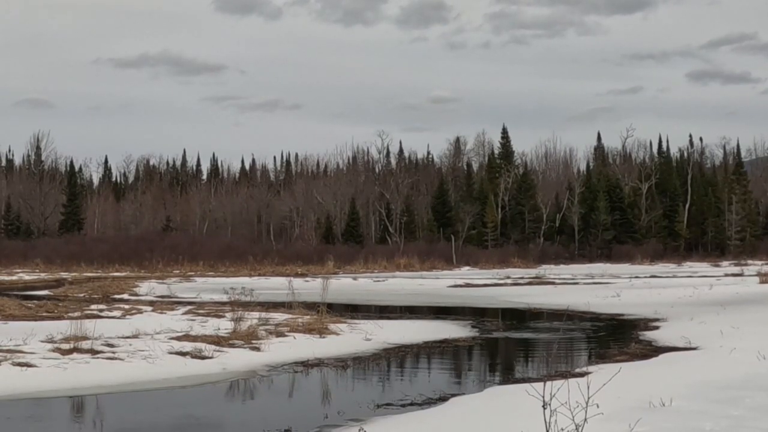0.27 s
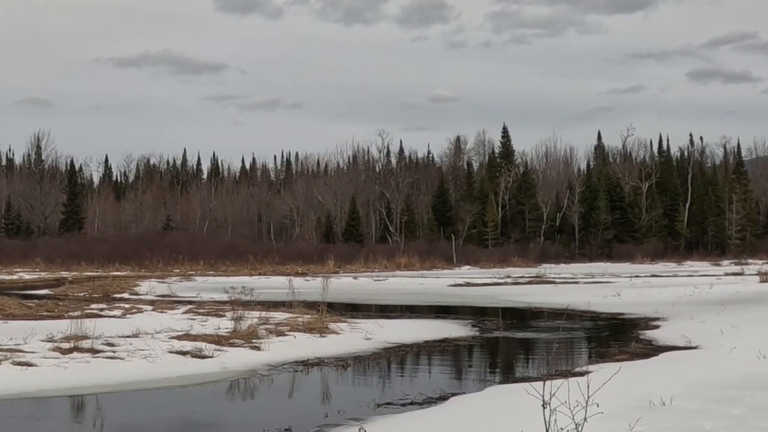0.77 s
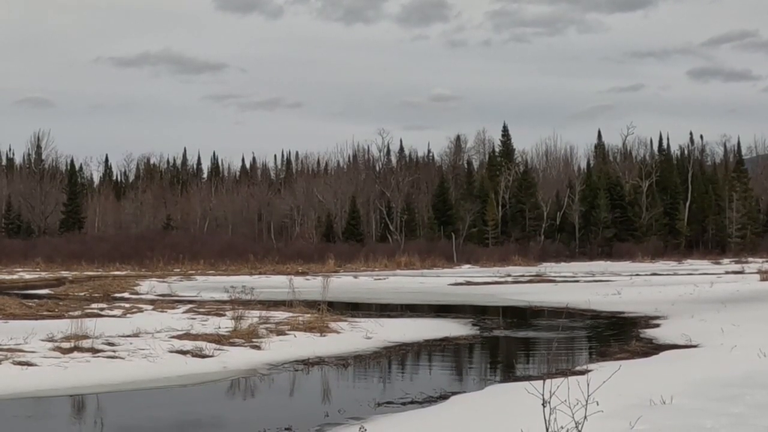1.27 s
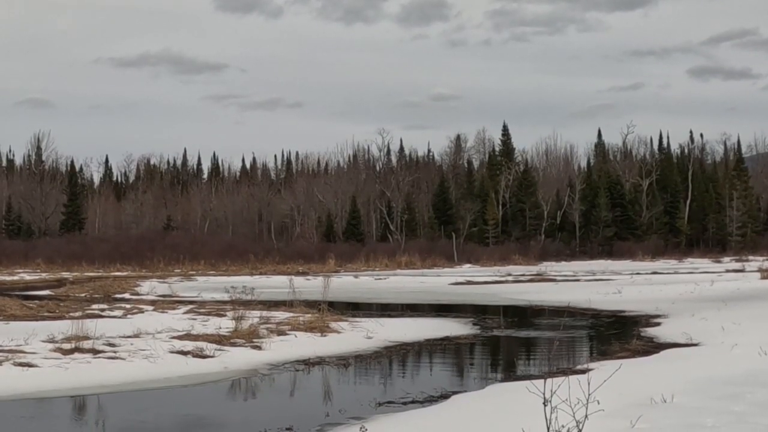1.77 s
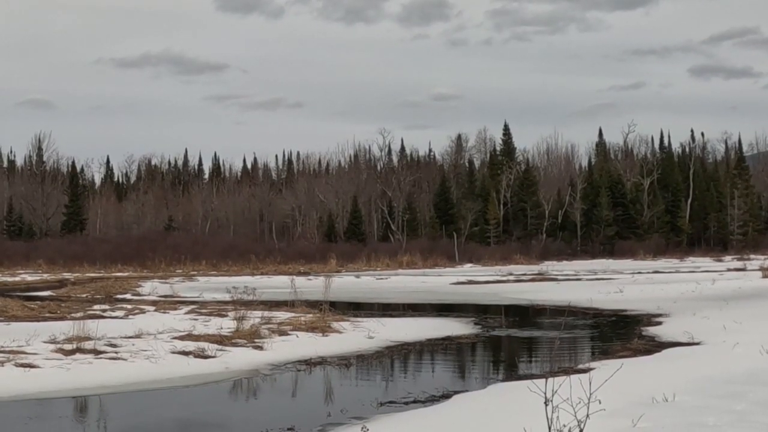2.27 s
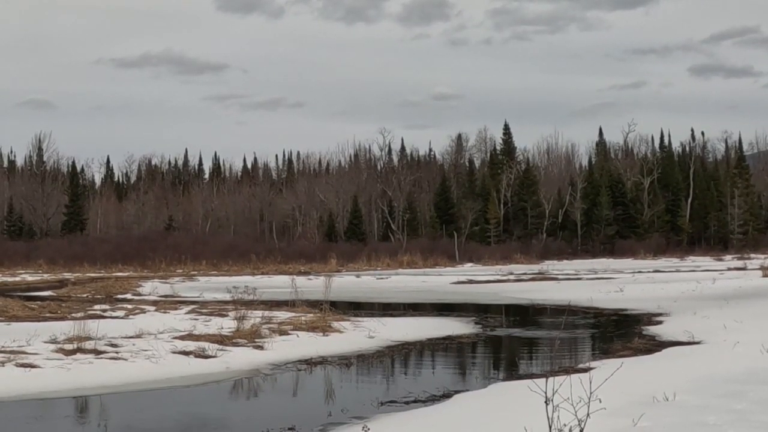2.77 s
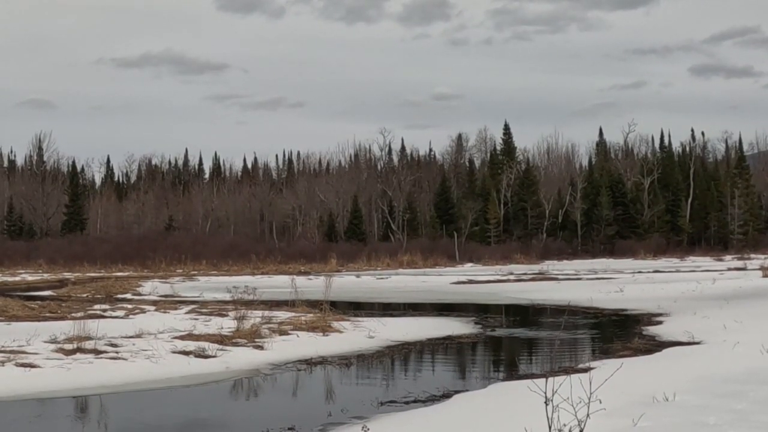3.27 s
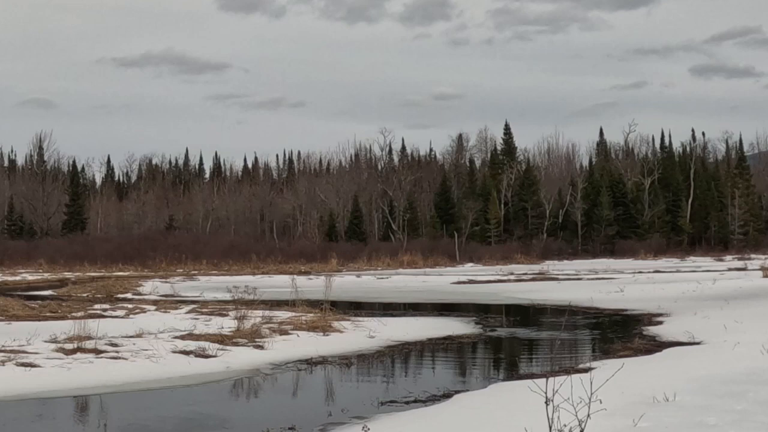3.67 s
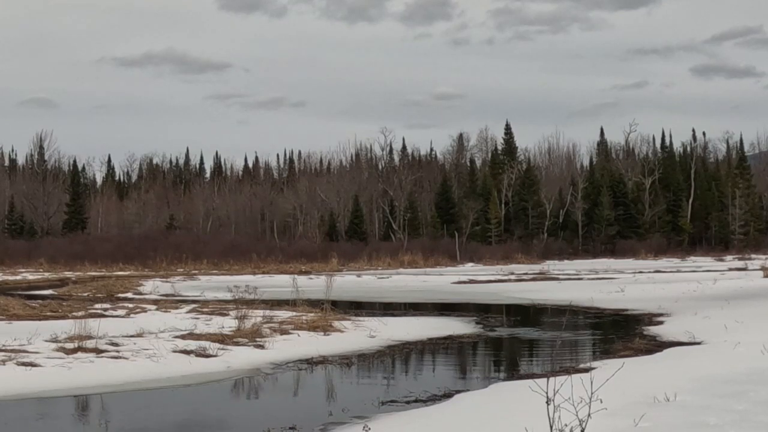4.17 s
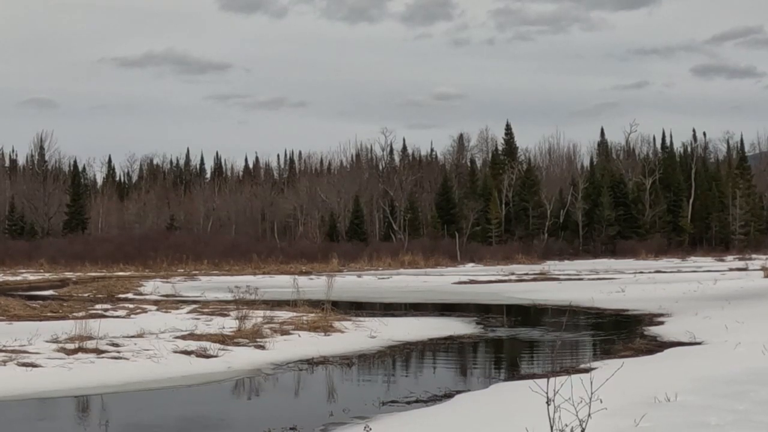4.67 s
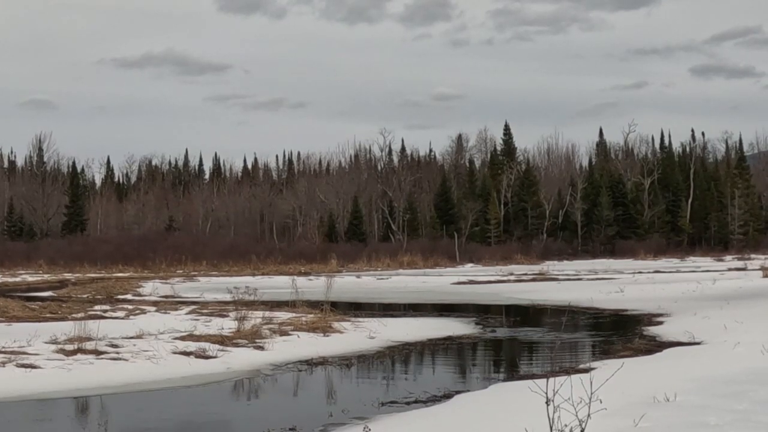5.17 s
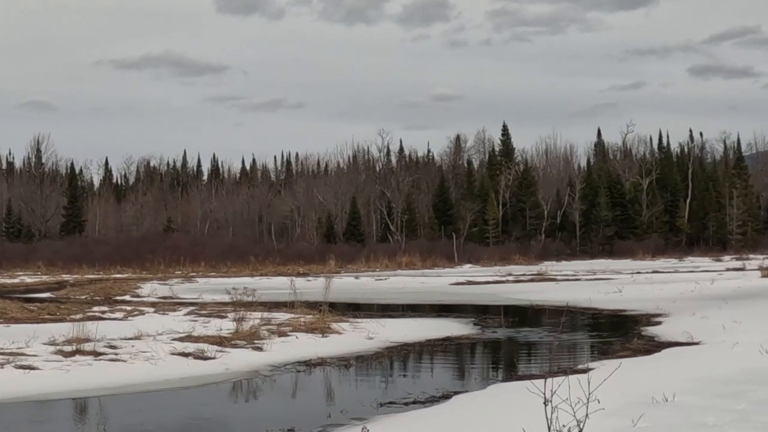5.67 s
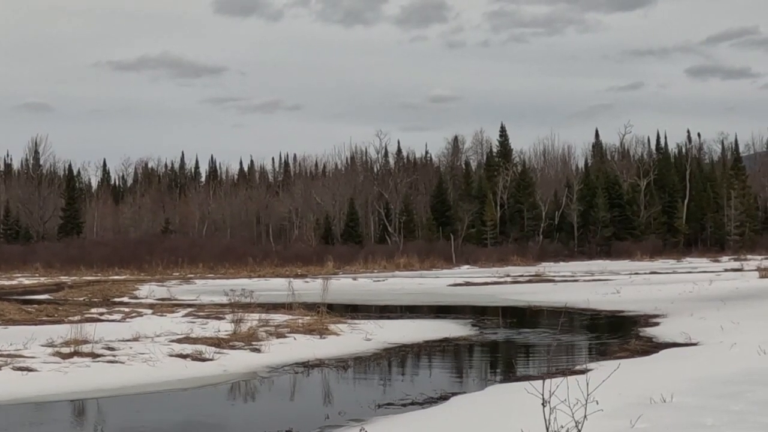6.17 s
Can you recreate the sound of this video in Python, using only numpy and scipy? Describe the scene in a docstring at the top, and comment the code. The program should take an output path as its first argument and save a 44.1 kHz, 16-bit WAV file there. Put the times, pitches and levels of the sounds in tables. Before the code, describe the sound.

Throughout about 6.4 seconds, a soft broad wind hiss comes from a distant forest, over a faint low rush, with dull gusts rumbling on the microphone, notably around 0.9, 1.35 and 2.1 s. A small woody tick sounds at 0.36 s, with two brighter ones at 1.7 and 1.9 s as snow is softly pressed. At 2.42 s an otter gives a very short arched chirp, followed at 2.6 s by a dull, granular crunch of snow crust. A sharper crunch lands at 3.5 s. At 3.9 s a louder, higher chirp cracks into a rough creak, then two rattling chuckles follow at about 4.0 and 4.15 s, with soft snow pressure beneath. A thin scattered echo fades over the marsh. From 5 s only wind and faint high ticks remain, with heavier low gusts from 5.6 s to the end.

```python
"""Wind hisses in a far forest and gusts rumble on the microphone; then a river otter calls across a snowy marsh:
two arched chirps, the second breaking into a creak, then two rattling chuckles.
Steps press the snow, two of them crunching through the crust, and twigs tick.
Wind, snow grains and echoes are shaped noise; ticks and crust are snaps ringing resonances.
The voice is a sum of harmonics of the vocal fold pulses, shaped by throat and mouth."""
import sys
import numpy as np
from scipy import signal
from scipy.fft import rfft, irfft
from scipy.io import wavfile
from scipy.ndimage import uniform_filter1d

SR = 44100
rng = np.random.default_rng(int(sys.argv[2]) if len(sys.argv) > 2 else 0)


def int16_out(signal):
    """Quantize to a 16-bit WAV file."""
    q = np.round(np.clip(np.atleast_2d(signal).T, -1, 1) * 32767)
    wavfile.write(sys.argv[1], SR, q.astype(np.int16))


N = 283324
TIME = np.arange(N) / SR   # s
CUTOFF_HZ = 13350   # top of the microphone's range


def from_db(db):
    """Decibels to gain."""
    return 10 ** (np.asarray(db) / 20)


def rms_one(x):
    """Scale to rms 1."""
    return x / np.sqrt(np.mean(x ** 2) + 1e-20)


def in_time(rows, t=TIME):
    """The columns of a curve over time, joined by straight lines."""
    s, *columns = np.transpose(sorted(tuple(row) for row in rows))
    return [np.interp(t, s, column) for column in columns]


def wander(per_s):
    """Slow chance drift, rms 1, with a new random target this many times a second."""
    return rms_one(np.interp(TIME * per_s, np.arange(1000), rng.standard_normal(1000)))


def swell(s, half_s):
    """A smooth rise and fall, 1 at its top and 1/e at half_s to either side."""
    return np.exp(-((TIME - s) / half_s) ** 2)


def low_pass(x, cut_hz):
    """Take the top off steeply."""
    return signal.sosfilt(signal.butter(10, cut_hz, fs=SR, output="sos"), x)


def coloured(x, spectrum):
    """Give a noise a smooth spectrum, straight in dB over log frequency; rms 1."""
    hz, db = np.transpose(spectrum)
    bins = np.maximum(np.fft.rfftfreq(N, 1 / SR), 1)
    gain = from_db(np.interp(np.log(bins), np.log(hz), db))
    return rms_one(irfft(rfft(x) * gain, N))


def ring(clicks, hz, width_hz):
    """Two passes through a resonance: a unit click swells quickly to about height 1 and dies."""
    r, w = np.exp(-np.pi * width_hz / SR), 2 * np.pi * hz / SR
    section = [1, 0, -1, 1, -2 * r * np.cos(w), r * r]
    return signal.sosfilt([section, section], clicks + 1e-18) * (1 - r) * np.e / 2


def fracture(s, splinter, decay_s):
    """A brittle break: one snap followed by a fading spray of tiny ones."""
    age = np.arange(SR // 20) / SR
    spray = splinter * rng.standard_normal(len(age)) * np.exp(-age / decay_s)
    spray[0] = 1
    return np.pad(spray, (round(s * SR), N))[:N]


def wind():
    """Turbulence rumbles on the microphone; the far air through the trees is a smooth rush and hiss."""
    # Gusts on the microphone. Each row: centre in seconds, half length in seconds, peak in dB.
    gusts = [(0.644, 0.09, -58), (.9, 0.065, -53), (1.348, 0.087, -51), (1.883, 0.075, -60),
             (2.135, 0.055, -50), (2.55, 0.37, -60), (3.82, 0.1, -61), (4.13, 0.022, -55.5),
             (4.25, 0.06, -60), (5.32, 0.074, -55.5), (5.663, 0.16, -50.5), (5.978, 0.085, -48),
             (6.306, 0.15, -49)]
    # Light breeze on the microphone. Each row: time in seconds, level in dB before a 3.5 dB lift.
    breeze = [(0.0, -80), (0.37, -76), (0.77, -61.5), (1.84, -74.5), (2.05, -70.5), (4.54, -71),
              (4.92, -81), (5.69, -61.5), (6.42, -61)]
    # Far low rush. Each row: time in seconds, level in dB.
    rush_level = [(0.0, -57), (1.81, -56), (1.98, -53), (5.29, -55), (5.69, -53.5), (6.22, -56.5),
                  (6.42, -56.5)]
    # High hiss. Each row: time in seconds, level in dB before a 2.5 dB lift.
    hiss_level = [(0.0, -68.5), (0.66, -67.5), (0.99, -71), (2.4, -70), (2.51, -68.5), (2.88, -71),
                  (3.35, -68.5), (4.5, -71), (5.13, -72.5), (6.42, -72)]
    # Spectra of the four layers. Each row: frequency in Hz, relative density in dB per Hz.
    rumble = [(15, -27), (35, -2), (70, -2), (110, -2.5), (180, -7), (400, -12), (1000, -67)]
    rush = [(30, -19.5), (100, -28), (145, -7.5), (195, 1.5), (300, -2.5), (430, -6), (700, -7.5),
            (950, -18.5), (1600, -55)]
    forest = [(300, -13.5), (700, -4), (1000, -2.5), (1350, 1), (1850, -0.5), (2400, -5), (3000, -8),
              (4000, -20.5), (6000, -28.5), (9000, -49.5)]
    hiss = [(2000, -1), (4000, 3), (5200, 1), (7000, -3), (8000, -13), (10000, -10.5), (11500, -16),
            (12400, -21), (13300, -31)]

    (breeze_db,), (rush_db,), (hiss_db,) = in_time(breeze), in_time(rush_level), in_time(hiss_level)
    # gusts swell out of the light breeze; eddies buffet both
    gust_power = sum((from_db(db) * swell(s, half_s)) ** 2 for s, half_s, db in gusts)
    power = from_db(breeze_db + 3.5) ** 2 + gust_power
    gust_db = 10 * np.log10(power) + 2.6 * wander(per_s=14)
    forest_db = -53.5 + 0.57 * wander(per_s=5)
    hiss_db = hiss_db + 2.5 + 0.76 * wander(per_s=12)
    layers = [(gust_db, rumble), (rush_db, rush), (forest_db, forest), (hiss_db, hiss)]
    return sum(from_db(db) * coloured(rng.standard_normal(N), spectrum) for db, spectrum in layers)


def ticks():
    """Small breaks in twigs and ice, each ringing briefly at its own pitch."""
    # Each row: start in seconds, peak in dB, pitch in Hz, resonance width in Hz.
    tick_rows = [(0.357, -47, 1920, 192), (1.730, -44, 2820, 1116), (1.942, -47, 3000, 1000),
                 (3.165, -67, 10300, 1800), (3.890, -68, 10800, 1790), (4.231, -65, 10800, 2480),
                 (5.18, -70, 10800, 1800), (5.470, -69, 11500, 2000), (5.555, -66, 10800, 1500),
                 (5.764, -60, 10400, 5000), (6.322, -67, 10700, 1500)]
    return sum(from_db(db) * ring(fracture(s, splinter=0.1, decay_s=0.011), hz, width_hz)
               for s, db, hz, width_hz in tick_rows)


def packing():
    """Each step presses the snow in one swell, with a faint, longer settling around it."""
    # Each row: centre in seconds, half length in seconds, level in dB.
    steps = [(1.928, 0.11, -56.5), (2.628, 0.025, -48), (3.513, .032, -45.5), (3.984, 0.069, -49)]
    settle_s, settle_db = 0.19, -10.5   # half length, level relative to the step
    settle_gain = from_db(settle_db)
    return sum(from_db(db) * (swell(s, half_s) + settle_gain * swell(s, settle_s))
               for s, half_s, db in steps)


def snow(splinter, grains_per_s, spread_db):
    """The crust breaks in dull snaps while fine grains grind under it."""
    # Crusts giving way. Each row: start in seconds, peak in dB, treble in dB relative to the peak.
    crunches = [(2.582, -35, -14), (2.6011, -33.5, -16), (2.61, -45, -1), (2.6235, -35, -17),
                (2.6324, -35, -9), (2.649, -44, 2), (2.669, -42, -16), (3.4805, -29, -21), (3.503, -29, 0),
                (3.513, -35.5, 2), (3.5224, -38, 5), (3.533, -54, -7)]
    # Low and high resonances of the crust. Each row: centre in Hz, width in Hz, relative level in dB.
    crust_low = [(500, 740, 0), (1010, 340, -21)]
    crust_high = [(1900, 390, -13), (3200, 440, -12), (6460, 710, -16.5)]
    # Spectrum of the grinding grains. Each row: frequency in Hz, relative density in dB per Hz.
    grain_spectrum = [(200, -10), (400, -1), (900, -1.5), (1500, -2), (3300, -4.5), (4200, -18),
                      (5500, -23), (6800, -19.5), (7800, -34), (11000, -38.5), (13000, -51)]

    low, high = np.zeros((2, N))
    for s, db, treble_db in crunches:
        snap = from_db(db) * fracture(s, splinter, decay_s=0.0018)
        low += snap
        high += from_db(treble_db) * snap
    snaps = sum(from_db(db) * ring(push, hz, width_hz)
                for push, modes in ((low, crust_low), (high, crust_high))
                for hz, width_hz, db in modes)
    # fine grains slip at random moments, a few of them much harder than the rest
    sizes = from_db(spread_db * np.minimum(rng.exponential(1, N), 4))
    slips = rng.random(N) < grains_per_s / SR
    grains = slips * rng.choice([-1, 1], N) * sizes
    return low_pass(snaps, cut_hz=8400) + packing() * coloured(grains, grain_spectrum)


def marsh(x, near_db, near_t60, far_db, far_t60):
    """Banks and brush scatter a short tail, the forest edge a faint long one; t60 in seconds."""
    age = TIME[:SR]
    fade = from_db(near_db - 60 * age / near_t60) + from_db(far_db - 60 * age / far_t60)
    onset = 1 - np.exp(-age / 0.0032)
    scatter = rng.standard_normal(SR) * fade * onset
    return signal.fftconvolve(x, scatter)[:N]


def resonance(hz, centre_hz, width_hz):
    """Gain of a steep-sided resonance, 1 on top."""
    return (1 + ((hz ** 2 - centre_hz ** 2) / (hz * width_hz)) ** 2 / 2) ** -2


def call(rows, lower_width_hz, upper_hz, upper_width_hz, upper_db, treble_db, fundamental_db,
         jitter, rasp, closing_hz=0):
    """Vocal fold pulses ring the throat: fast ones give a whistle with overtones, slow ones a rattle."""
    # Fixed resonances of the mouth. Each row: centre in Hz, width in Hz, level in dB;
    # all but the first also get the call's treble_db.
    fixed_resonances = [(1500, 600, -6), (4900, 600, -15), (6750, 650, -28)]
    closing_s, closed_s = 0.036, 0.016   # the jaw starts and ends its closing this long before the end

    inside = (TIME >= rows[0][0]) & (TIME <= rows[-1][0])
    t = TIME[inside]
    rate, level_db, lower_hz, open_db = in_time(rows, t)
    # a closing jaw lowers the upper resonance
    upper_hz = upper_hz - closing_hz * np.interp(t[-1] - t, [closed_s, closing_s], [1, 0])
    waver, flutter, tremor = (rms_one(uniform_filter1d(rng.standard_normal(len(t)), size=60))
                              for _ in range(3))
    phase = 2 * np.pi * np.cumsum(rate * (1 + jitter * waver)) / SR
    orders = np.arange(1, int(CUTOFF_HZ / rate.max()) + 1)[:, None]
    hz = orders * rate
    # an opening mouth lets the upper and fixed resonances out, with a small random tremor
    low, *high = (from_db(db) * resonance(hz, centre_hz, width_hz)
                  for centre_hz, width_hz, db in fixed_resonances)
    upper = from_db(upper_db) * resonance(hz, upper_hz, upper_width_hz)
    mouth = low + upper + from_db(treble_db) * sum(high)
    gain = resonance(hz, lower_hz, lower_width_hz) + from_db(open_db + 3.5 * tremor) * mouth
    gain[0] += from_db(fundamental_db)   # the fundamental leaks out below the resonances
    # minimum phase: the throat rings after each pulse
    mirrored = np.vstack([gain, gain[::-1]])
    lag = signal.hilbert(np.log(mirrored + 1e-3), axis=0).imag[:len(gain)]
    harmonics = (gain * np.cos(orders * phase - lag)).sum(axis=0)
    voice = harmonics / np.sqrt((gain ** 2).sum(axis=0) / 2)   # even power, so level_db sets the level
    out = np.zeros(N)
    out[inside] = voice * from_db(level_db) * (1 + rasp * flutter) * signal.windows.tukey(len(t), 0.06)
    return out


def voice_breaks():
    """At each break the folds catch for an instant, then let go with a kick."""
    # Moments where the squeal breaks at its top, in seconds.
    breaks = [3.9282, 3.9352]
    catch_s, catch_db, kick_s, kick_db = 0.0012, -13.5, 0.003, 9.5
    change_db = 0
    for s in breaks:
        catch = catch_db * swell(s - catch_s, catch_s)
        kick = kick_db * (TIME > s) * np.exp(-abs(TIME - s) / kick_s)
        change_db = change_db + catch + kick
    return from_db(change_db)


def otter():
    """The otter's folds whistle in the clean chirps, then pulse slowly in the creak and chuckles."""
    # One table per call. Each row: time in seconds, pulse rate in Hz, level in dB,
    # lower throat resonance in Hz, mouth opening in dB.
    chirp_rows = [(2.415, 818, -45, 1990, -9), (2.431, 906, -31.5, 2260, -22), (2.443, 961, -35, 2150, 3),
                  (2.452, 947, -38, 2160, -6), (2.461, 802, -35, 2130, -11), (2.467, 740, -42, 2200, -6),
                  (2.475, 700, -65, 2200, -12)]
    squeal_rows = [(3.900, 938, -47, 2300, -8), (3.909, 1022, -33, 2310, -4), (3.916, 1206, -29, 2450, -12),
                   (3.925, 1415, -28, 2700, -11), (3.936, 1410, -33.5, 2720, -12.5),
                   (3.944, 1110, -34, 2400, -8), (3.955, 1000, -40, 2200, 0)]
    creak_rows = [(3.925, 148, -44, 2830, -12), (3.932, 150.7, -36, 2850, -13),
                  (3.950, 237.5, -40, 2420, -8), (3.966, 227.6, -40.5, 2300, -13),
                  (3.990, 219, -54, 2250, -17)]
    long_rows = [(3.9885, 176.8, -50, 2440, -33), (4.004, 185, -37, 2430, -36),
                 (4.022, 246, -29, 2540, -28), (4.030, 261.6, -27.5, 2770, -14),
                 (4.041, 296.8, -25.5, 2150, -3.5), (4.054, 303, -25, 2140, -4.5),
                 (4.066, 311, -28.5, 2030, -3.5), (4.073, 293, -37, 2020, -15.5),
                 (4.083, 254, -45, 2040, -14)]
    short_rows = [(4.1218, 205, -52, 2300, -13.5), (4.138, 223.4, -39, 2500, -3),
                  (4.149, 251.5, -30, 2570, -3), (4.162, 271.4, -26.5, 2700, 0),
                  (4.171, 273.7, -25, 2650, 1), (4.179, 219, -33, 2330, -8), (4.186, 257, -34, 2160, -17),
                  (4.199, 245, -52, 2100, -6)]

    chirp = call(chirp_rows, lower_width_hz=780, upper_hz=3770, upper_width_hz=400, upper_db=-7,
                 treble_db=-4, fundamental_db=-24, jitter=0.0023, rasp=0.04)
    squeal = call(squeal_rows, lower_width_hz=1030, upper_hz=3580, upper_width_hz=800, upper_db=-13,
                  treble_db=-8, fundamental_db=-16, jitter=0.014, rasp=0.1)
    creak = call(creak_rows, lower_width_hz=330, upper_hz=3910, upper_width_hz=280, upper_db=-1,
                 treble_db=-6, fundamental_db=-46, jitter=0.05, rasp=0.17)
    long_chuckle = call(long_rows, lower_width_hz=670, upper_hz=3500, upper_width_hz=850, upper_db=2.5,
                        treble_db=2, fundamental_db=-40, jitter=0.0067, rasp=0.054, closing_hz=450)
    short_chuckle = call(short_rows, lower_width_hz=880, upper_hz=3870, upper_width_hz=560, upper_db=-12,
                         treble_db=-18, fundamental_db=-42, jitter=0.0084, rasp=0.03)
    calls = chirp + squeal * voice_breaks() + creak + long_chuckle + short_chuckle
    return low_pass(calls, cut_hz=6700)


def scene():
    """Wind, ticks and snow around the otter and its echoes, on one channel."""
    background = wind() + ticks()
    footsteps = snow(splinter=0.08, grains_per_s=1800, spread_db=3)
    voice = otter()
    echoes = marsh(voice, near_db=-47.5, near_t60=0.4, far_db=-59, far_t60=0.98)
    return (background + footsteps + voice + echoes)[None]


def record(dry):
    """The microphone has a notch in the treble, applied twice; the top is cut steeply."""
    notch = signal.iirnotch(9200, 6, fs=SR)   # centre in Hz, sharpness Q
    heard = signal.lfilter(*notch, signal.lfilter(*notch, dry))
    top_cut = signal.ellip(10, 0.1, 80, CUTOFF_HZ, fs=SR, output="sos")
    return signal.sosfilt(top_cut, heard)


dry = scene()
out = record(dry)
int16_out(out)
```